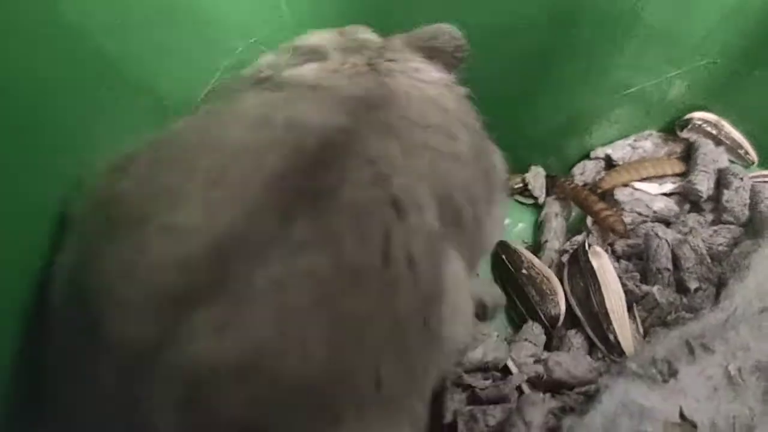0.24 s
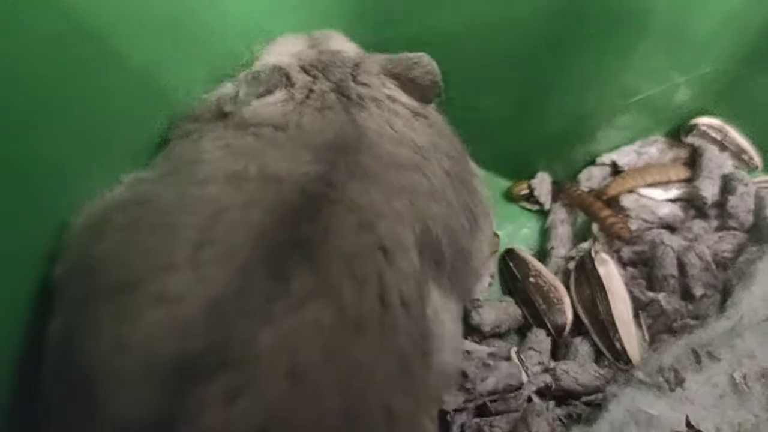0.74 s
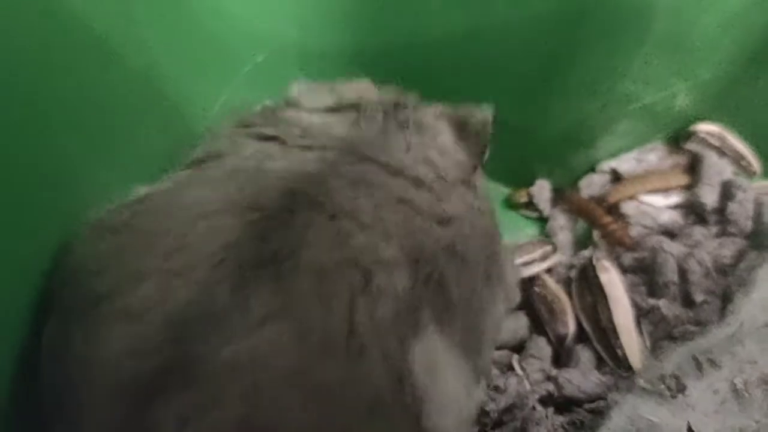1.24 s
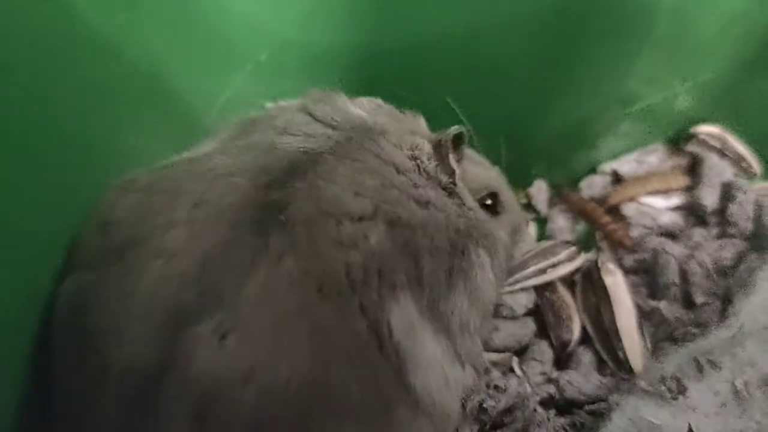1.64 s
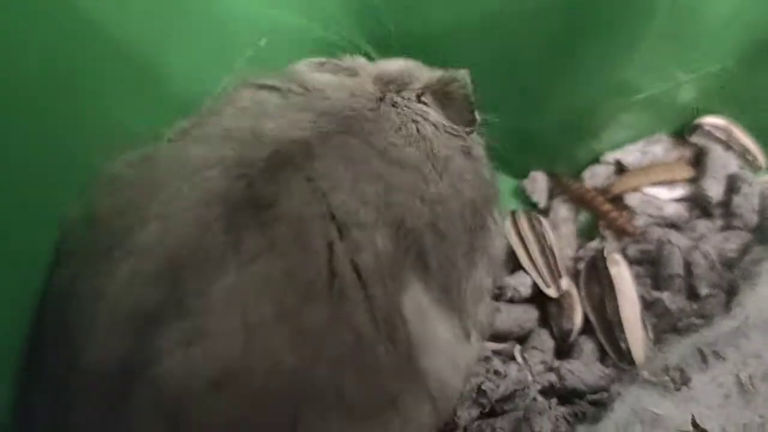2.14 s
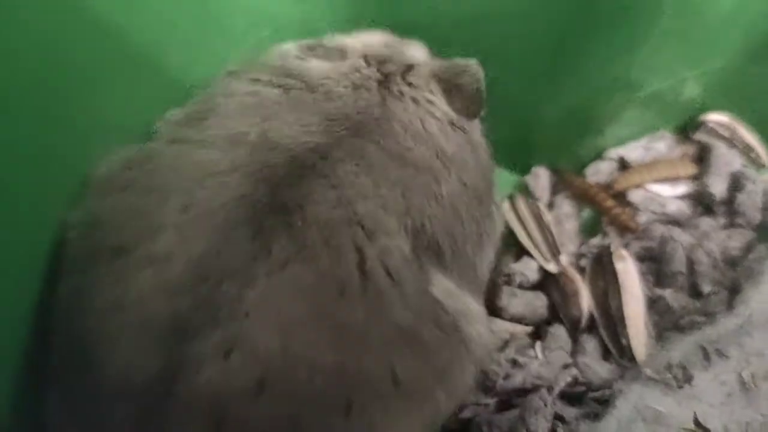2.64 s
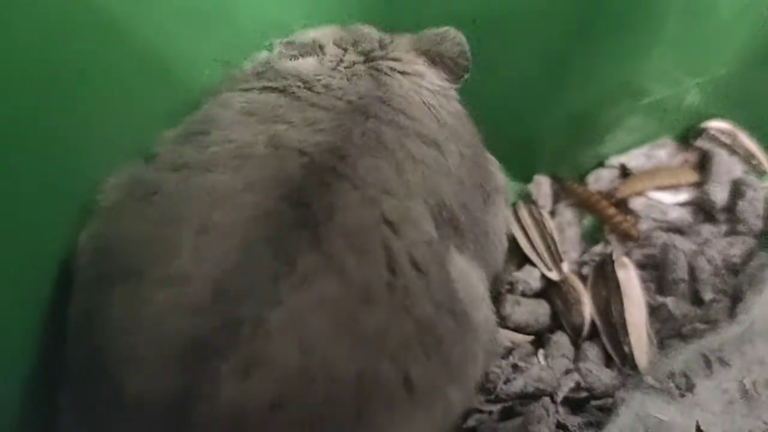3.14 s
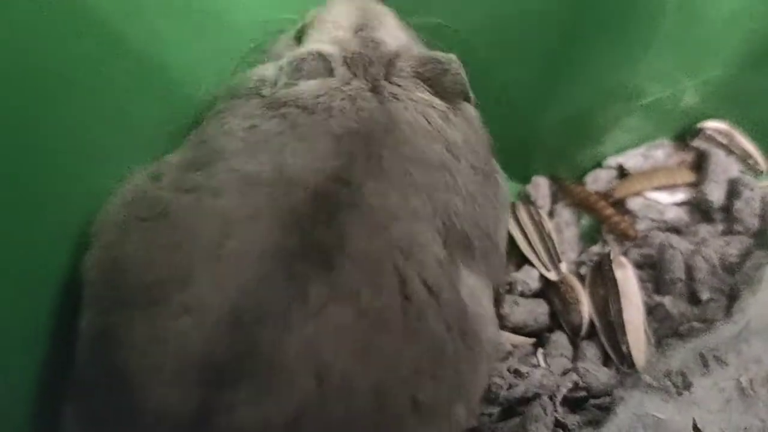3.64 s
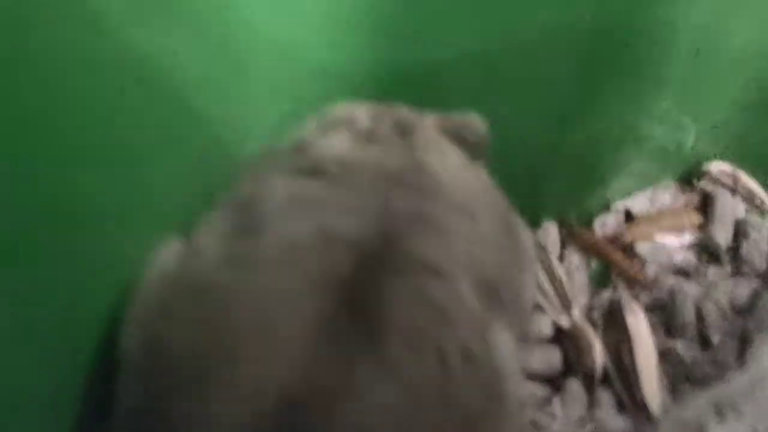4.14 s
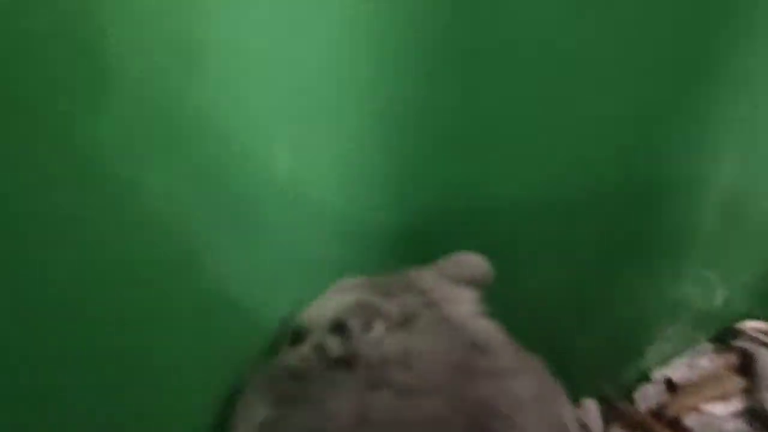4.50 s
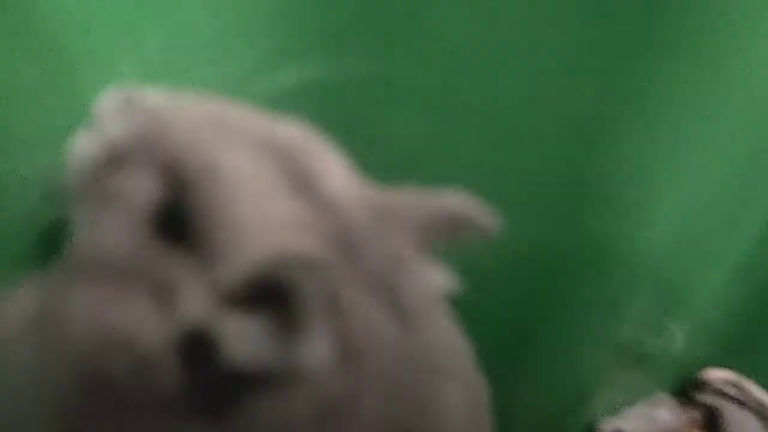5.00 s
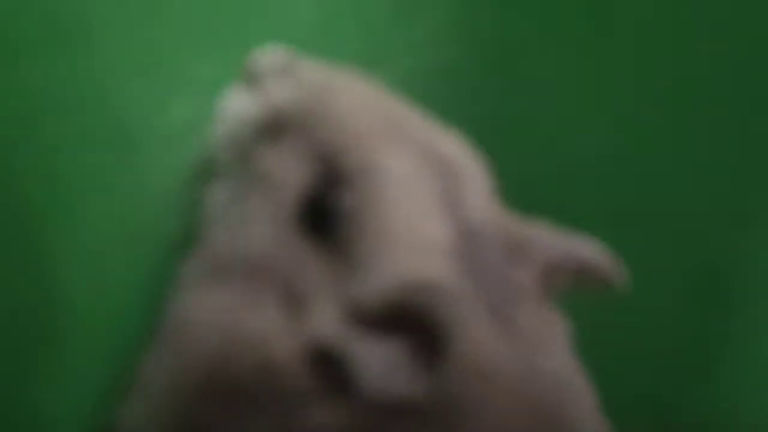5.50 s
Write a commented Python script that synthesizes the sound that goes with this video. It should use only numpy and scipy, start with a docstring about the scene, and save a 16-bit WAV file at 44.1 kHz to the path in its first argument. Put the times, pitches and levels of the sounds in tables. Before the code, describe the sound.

Quiet, close indoor sound: seed husks and claws tap a plastic wall with tiny short rings over faint papery rustling. The right side is crisp; the left is muffled with low finger sway. After sparser ticks around three seconds, a cluster of sharper clicks follows, then dull handling thuds, skin rubs and pressure pops dominate, fading to low unsteady rumble.

```python
"""In a plastic tub, close to a hand-held camera, a hamster shifts seeds and paper bedding.
Husks snap and tap the tub wall (short blows set off dying tones) over a rustle of many tiny taps.
Faint low noise is a swell in the room, then camera handling from about 4.4 s; a faint hum wavers.
A finger covers the left microphone port: it muffles the scene there and adds sway, rubbing and pops.
Near the end the hand slides on the camera as it is moved, with dull, ringing bumps."""
import sys
import numpy as np
from scipy import signal
from scipy.fft import rfft, irfft
from scipy.io import wavfile

SR = 44100
rng = np.random.default_rng(int(sys.argv[2]) if len(sys.argv) > 2 else 0)


def master(y):
    """Save y as 16-bit WAV."""
    cut = np.clip(np.atleast_2d(y).T, -1, 1)
    pcm = np.round(cut * 32767)  # scale
    wavfile.write(sys.argv[1], SR, pcm.astype(np.int16))


N = 254016
TIME = np.arange(N) / SR

# Faint low rumble: a swell in the room, then handling of the camera from about 4.4 s:
# start_s, level_db (rms)
RUMBLE_LEVEL = [(0.0, -60.5), (2.0, -59.5), (3.2, -44), (3.8, -48.5), (4.4, -43.5), (5.25, -56), (5.7, -48)]
# Tone colour of the rumble: pitch_hz, density_db (relative, per Hz)
RUMBLE_SPECTRUM = [(10, -2), (60, 2), (110, 2), (175, 0.5), (260, -7.5), (350, -15.5), (500, -29.5),
                   (1200, -96.5)]
# Steady background noise at the open right port: pitch_hz, density_db (per Hz)
OPEN_PORT_NOISE = [(20, -80), (170, -85.5), (240, -90), (300, -90.5), (450, -90.5), (550, -99),
                   (950, -95.5), (1400, -100), (1830, -96), (3200, -109), (4300, -123), (7400, -116),
                   (9500, -126), (16000, -129)]
# Steady background noise at the covered left port: pitch_hz, density_db (per Hz)
COVERED_PORT_NOISE = [(20, -77), (230, -108), (400, -107), (700, -109), (1200, -114), (1900, -110),
                      (3000, -118), (4500, -127), (16000, -129)]
# Shoves of the paws through the bedding: peak_s, length_s, scrape_db (on the tub), fizz_db (of paper)
SHOVES = [(0.334, .09, -48.5, -60.5), (0.466, 0.059, -54, -69), (0.59, 0.16, -55.5, -69),
          (0.724, 0.049, -57.5, -65), (0.939, 0.13, -52, -67), (1.023, 0.035, -71, -92),
          (1.214, 0.15, -58.5, -85), (1.324, 0.032, -59.5, -84), (1.472, .06, -56.5, -79),
          (1.781, 0.13, -55.5, -63), (1.915, 0.1, -60, -80), (2.11, 0.056, -61, -65.5),
          (2.246, 0.018, -55, -61), (2.475, .1, -63.5, -78), (2.522, 0.11, -50, -71),
          (2.752, 0.04, -52, -68), (3.488, 0.079, -58.5, -71), (3.81, 0.17, -55, -69),
          (3.946, 0.25, -60, -72.5), (4.606, 0.068, -44, -63), (4.75, 0.32, -60.5, -68.5),
          (5.122, 0.1, -62, -73), (5.715, 0.069, -55, -67.5)]
# Fur and paws pushing the bedding: pitch_hz, density_db (relative, per Hz)
SCUFF_SPECTRUM = [(100, -4.5), (300, -2.5), (460, -6), (560, 0.5), (720, -8), (1500, -14.5), (4000, -52)]
# Ringing tones of the tub: pitch_hz, level_db (relative), t60_s (time to fall by 60 dB)
TUB_MODES = [(455, -11.5, 0.051), (724, 0, 0.027), (856, -8, 0.062), (1034, 0.5, 0.033), (1094, 0, 0.034),
             (1373, -0.5, 0.04), (1714, -6.5, 0.011), (1810, 6, 0.039), (2084, 3.5, 0.009),
             (2280, -19.5, 0.0047), (2430, -7.5, 0.0094), (2575, 1, 0.012), (2670, -11, 0.042),
             (3370, -16.5, 0.0013), (3577, -9.5, 0.017)]
# Tone colour of a snapping husk: pitch_hz, level_db (relative)
HUSK_SPECTRUM = [(1500, -18), (3400, 4.5), (4300, -11.5), (5100, -1.5), (5900, -2.5), (6550, 2),
                 (6850, -1.5), (7250, 2.5), (7560, 3.5), (8200, -3), (9200, -11.5), (11000, -19.5),
                 (16000, -28.5)]
# How hard the finger presses on the left port: start_s, press_db (relative)
PRESS_LEVEL = [(0.0, -34.5), (0.55, -26.5), (0.75, -34.5), (1.9, -34.5), (2.05, -31), (2.25, -39.5),
               (2.98, -34.5), (3.15, -38), (4.12, -32.5), (4.48, -17.5), (4.56, -22.5), (4.64, -11),
               (4.73, -4.5), (4.9, -8), (5.12, -9.5), (5.19, -20), (5.53, -23.5), (5.62, -12),
               (5.76, -30.5)]
# Slow sway of the finger: pitch_hz, density_db (relative, per Hz)
SWAY_SPECTRUM = [(2, -16.5), (7, 6), (12, 7), (20, -2), (35, -8), (48, -25), (60, -25.5), (100, -46.5),
                 (200, -56), (500, -114.5)]
# Quick shiver of the fingertip: pitch_hz, density_db (relative, per Hz)
SHIVER_SPECTRUM = [(10, -24), (28, 7), (42, 4), (52, -7.5), (65, -16.5), (100, -23), (200, -49), (500, -93)]
# Slips of the finger over the port: peak_s, rise_s, fall_s, rub_db (counted above 330 Hz)
FINGER_SLIPS = [(3.94, 0.047, .04, -60.5), (4.24, 0.065, 0.21, -62.5), (4.5, 0.082, 0.058, -53),
                (4.63, 0.04, 0.029, -48.5), (4.96, 0.049, 0.054, -57), (5.099, 0.052, 0.04, -41.5),
                (5.41, 0.047, 0.13, -49), (5.66, 0.081, 0.077, -44.5)]
# Skin rubbing on the port: pitch_hz, density_db (relative, per Hz)
RUB_SPECTRUM = [(20, -13), (70, 5.5), (110, -8), (200, -12), (300, -17.5), (500, -26), (1000, -36),
                (2000, -45.5), (3000, -54), (4500, -76), (16000, -96)]
# What the finger lets through: pitch_hz, gain_db
FINGER_MUFFLE = [(50, -9.5), (250, -15.5), (700, -17.5), (1200, -34), (2000, -36.5), (4000, -43),
                 (8000, -49.5), (16000, -34.5)]
# Single seeds and claws on the tub, as rms over 10 ms: start_s, knock_db, wall_db, snap_db
SEED_TAPS = [(0.061, -50, -53, -82), (0.0769, -49.5, -44, -51.5), (0.2428, -42.5, -59, -71),
             (0.287, -50.5, -53, -63.5), (0.3103, -62, -38, -60), (0.3318, -65, -43, -58),
             (0.3562, -45, -51, -64), (0.382, -56, -54, -58), (0.4668, -66, -55, -59),
             (0.5883, -76, -45, -57.5), (0.7232, -51, -49, -77), (0.775, -56, -50.5, -71),
             (0.7974, -48.5, -44, -73), (0.8151, -56, -47.5, -70), (0.8689, -70, -52, -60),
             (0.9203, -49, -42, -69), (0.9702, -63, -56, -77), (1.0292, -49.5, -74, -90),
             (1.0752, -52, -77, -84), (1.2198, -53, -62, -68.5), (1.3073, -50.5, -55, -79),
             (1.5922, -50.5, -53.5, -67), (1.7371, -52, -53, -54), (1.804, -70, -73, -53.5),
             (1.8407, -54, -51.5, -68), (2.0032, -52.5, -53, -67), (2.064, -55, -50, -67.5),
             (2.1342, -58.5, -60, -58.5), (2.2116, -48.5, -51.5, -88), (2.5025, -43, -49, -70),
             (2.5128, -58, -46.5, -64), (2.6198, -48, -37, -46.5), (2.7707, -59, -58, -60),
             (2.7903, -47.5, -49.5, -68), (2.8713, -70, -66, -62.5), (2.997, -72, -67, -63),
             (3.1213, -66, -62, -59.5), (3.3174, -58.5, -59, -61.5), (3.4586, -46, -45, -50),
             (3.5811, -47, -42, -56), (3.6009, -44, -40.5, -47.5), (3.6479, -44, -43, -58.5),
             (3.7217, -43.5, -46, -70), (3.78, -56, -41.5, -59.5), (3.8111, -63, -48, -60),
             (3.9362, -47.5, -38, -50.5), (3.9407, -36.5, -37.5, -39.5), (3.98, -52, -39.5, -53),
             (4.0159, -61, -43, -67), (4.038, -76, -50, -83), (4.1043, -73, -51.5, -83),
             (4.1282, -72, -56, -85), (4.5822, -40.5, -38.5, -60), (4.5979, -36.5, -53, -45),
             (4.8065, -46.5, -51, -76), (4.8289, -41.5, -50, -67), (5.6992, -56, -58, -69)]
# Dull knocks as the fingertip shifts its grip: start_s, peak_db
GRIP_NUDGES = [(1.354, -37), (2.506, -35.5), (3.007, -47.5), (3.868, -36.5), (3.966, -36.5), (4.733, -22.5),
               (4.952, -28.5), (5.097, -19.5)]
# Ringing of air and skin at the covered port: pitch_hz, level_db (relative), t60_s
PORT_MODES = [(245, 3, 0.011), (425, -9.5, 0.025), (650, -14, 0.035)]
# The skin lets go of the port: start_s, peak_db, length_s
SKIN_POPS = [(4.47, -54, .0004), (4.492, -40.5, 0.00062), (4.522, -42, 0.0005), (4.5797, -41, 0.00072),
             (4.7408, -10.5, 0.0038), (4.7494, -27.5, 0.00055), (4.8591, -23, 0.0016),
             (5.0986, -34, 0.00065), (5.1065, -13, 0.00068), (5.115, -24.5, 0.0003)]
# The hand slides on the camera: start_s, level_db (rms)
SLIDE_LEVEL = [(4.57, -100), (4.61, -53), (4.69, -55), (4.78, -55), (4.84, -55), (4.9, -68), (5.0, -91),
               (5.1, -120)]
# Tone colour of the sliding hand: pitch_hz, density_db (relative, per Hz)
SLIDE_SPECTRUM = [(350, 5.5), (750, 8.5), (1200, 0), (1800, 9), (3000, -4), (4400, -18), (5600, -10),
                  (7300, -5.5), (9000, -9.5), (12000, -16), (16000, -22)]
# Bumps of the camera: start_s, wobble_db (lowest mode), thud_db (the other modes)
CAMERA_BUMPS = [(4.582, -21.5, -36), (4.599, -44, -29.5), (4.668, -26, -35), (4.8306, -27, -21)]
# Ringing tones of the bumped body: pitch_hz, level_db (relative), t60_s
BODY_MODES = [(28.7, 1.5, 0.91), (58.6, -14, .2), (94.4, -6, 0.44), (161.4, -3.5, 0.15), (197.4, 0, 0.054),
              (296, -0.5, 0.032), (545, -4.5, 0.029), (815, -5, 0.036)]

EDGE_HZ = 16100  # highest pitch that the camera passes
HUM_HZ, HUM_DB = 227.2, -63.5  # centre pitch, rms level
SHOVE_RISE = 0.5  # share of a shove's length that goes to the build-up
GRIP_RUB_DB = -51.5  # rubbing of the resting finger, relative to its press
# Small restless movements between shoves, steady until they fade out
FIDGET_SCRAPE_DB, FIDGET_FIZZ_DB = -67, -89
FIDGET_END_S, FIDGET_FADE_S = 2.92, 0.32  # start and length of the fade


def amp(db):
    """Turns decibels into a plain gain."""
    return 10 ** (np.asarray(db) / 20)


def rms(x):
    """Average strength: the root of the mean square."""
    return np.sqrt(np.mean(x ** 2) + 1e-24)


def level(table):
    """A gain curve drawn through points of time and decibels."""
    return amp(np.interp(TIME, *np.transpose(table)))


def add(mix, start_s, sound):
    """Mixes a sound in at its start time, cut off at the end of the mix."""
    part = mix[round(start_s * SR):][:len(sound)]
    part += sound[:len(part)]


def gains(points, size):
    """Reads a spectrum at the FFT pitches, with straight lines over log pitch."""
    hz, db = np.transpose(points)
    bins_hz = np.fft.rfftfreq(size, 1 / SR)
    return amp(np.interp(np.log(bins_hz + 1), np.log(hz + 1), db))


def noise(points):
    """Random hiss shaped to the given power per Hz."""
    white = rfft(rng.standard_normal(N))
    return irfft(white * gains(points, N), N) * np.sqrt(SR / 2)


def swell(gain, spectrum):
    """Coloured noise that follows a level curve."""
    x = noise(spectrum)
    return gain * x / rms(x)


def flutter(depth_db, rate_hz):
    """A random gain of unit rms that wanders mostly slower than the given rate."""
    x = noise([(rate_hz / 8, 0), (rate_hz, 0), (3 * rate_hz, -30), (12 * rate_hz, -80)])
    gain = amp(depth_db * x / rms(x))
    return gain / rms(gain)


def stroke(peak, rise, fall):
    """One smooth movement: it builds up to its peak and eases off."""
    return np.exp(-((TIME - peak) / np.where(TIME < peak, rise, fall)) ** 2)


def causal(points, size=1024):
    """The sharpest impulse response with the given spectrum (minimum phase)."""
    half = np.log(gains(points, size))
    whole = np.r_[half, half[-2:0:-1]]
    spectrum = np.exp(np.conj(signal.hilbert(whole)))
    return np.fft.ifft(spectrum).real[:size // 2]


def ring(modes, t, scatter_db, detune):
    """Dying tones; each blow lands elsewhere, so their weights and pitches vary."""
    hz, db, t60 = np.transpose(modes)[:, :, None]
    weight, shift, side = rng.standard_normal((3, len(modes), 1))
    envelope = amp(db + scatter_db * weight - 60 * t / t60)
    tone = np.sin(2 * np.pi * hz * (1 + detune * shift) * t)
    return (np.sign(side) * envelope * tone).sum(0)


def contact(t, scatter_db, t60, rise=0.00015):
    """A sharp blow, then a dying spray of tiny contacts and reflections."""
    decay = np.exp(-np.log(1000) * t / t60)
    spray = rng.standard_normal(len(t)) * decay * (1 - np.exp(-t / rise))
    return (t == 0) + amp(scatter_db) * spray / np.linalg.norm(spray)


def tap(husk, size=2400):
    """One seed on the tub: low knock, wall ring and husk snap, each of unit energy."""
    t = np.arange(size) / SR
    low_modes = [mode for mode in TUB_MODES if mode[0] < 1550]
    high_modes = [mode for mode in TUB_MODES if mode[0] >= 1550]
    blow = contact(t, scatter_db=-4.5, t60=0.037)
    knock = ring(low_modes, t, scatter_db=2.5, detune=0.01)
    wall = ring(high_modes, t, scatter_db=3.5, detune=0.012)
    crack = contact(t, scatter_db=2, t60=.019)
    pairs = ((blow, knock), (blow, wall), (crack, husk))
    parts = [signal.fftconvolve(a, b)[:size] for a, b in pairs]
    return np.array([part / np.linalg.norm(part) for part in parts])


def rumble():
    """Low noise on a level curve: a swell in the room, then camera handling from about 4.4 s."""
    return swell(level(RUMBLE_LEVEL), RUMBLE_SPECTRUM)


def hum(waver_hz):
    """A faint tone in the room whose pitch wavers at random."""
    drift = noise([(1, 0), (8, -2.0), (30, -53.0), (200, -100)])
    pitch_hz = HUM_HZ + waver_hz * drift / rms(drift)
    return amp(HUM_DB) * np.sqrt(2) * np.sin(2 * np.pi * np.cumsum(pitch_hz) / SR)


def stirring():
    """Strength of scraping and of fizz: the powers of shoves and fidgeting add up."""
    fidget = np.clip((FIDGET_END_S - TIME) / FIDGET_FADE_S + 1, 0, 1)
    power = np.outer(amp([FIDGET_SCRAPE_DB, FIDGET_FIZZ_DB]), fidget) ** 2
    for peak_s, length, *db in SHOVES:
        shove = stroke(peak_s, SHOVE_RISE * length, (1 - SHOVE_RISE) * length)
        power += np.outer(amp(db), shove) ** 2
    return np.sqrt(power)


def rustle(husk, scuff_db=-9, knock_db=1, per_s=1100, spread_db=7, count=20):
    """Crowds of tiny taps, as strong as the animal stirs, over the soft scuff of its body."""
    scrape, fizz = np.zeros((2, N))
    for _ in range(count):  # each kind of tap recurs at random times and strengths
        knock, wall, snap = tap(husk)
        hits = rng.random(N) < per_s / count / SR
        train = hits * amp(spread_db * np.minimum(rng.exponential(1, N), 3.2))
        scrape += signal.oaconvolve(train, amp(knock_db) * knock + wall)[:N]
        fizz += signal.oaconvolve(train, snap)[:N]
    scraping, fizzing = stirring()
    scuff = amp(scuff_db) * swell(scraping, SCUFF_SPECTRUM)
    return scraping * scrape / rms(scrape) + fizzing * fizz / rms(fizz) + scuff


def finger(sway_db=-1, shiver_db=-5, firm_db=-22):
    """The fingertip pumps the air trapped in the port, shivers in fits, and judders as it slides."""
    pressing = level(PRESS_LEVEL)
    rubbing = amp(GRIP_RUB_DB) * pressing
    for peak_s, rise, fall, db in FINGER_SLIPS:
        rubbing += amp(db) * stroke(peak_s, rise, fall)
    sway = noise(SWAY_SPECTRUM)
    # even out the sway, so that the press curve sets its strength
    sway /= np.sqrt(signal.oaconvolve(sway ** 2, np.hanning(SR // 7) / (SR // 14), "same"))
    shiver = noise(SHIVER_SPECTRUM) * flutter(depth_db=4, rate_hz=15)
    # a firm press damps the shiver
    shiver *= amp(shiver_db) / rms(shiver) / np.sqrt(1 + pressing / amp(firm_db))
    pressure = pressing * (amp(sway_db) * sway + shiver)
    # the seal leaks when pushed hard, which rounds off the largest swings
    pressure /= (1 + (pressure / .72) ** 4) ** .25
    rub = noise(RUB_SPECTRUM) * flutter(depth_db=3.0, rate_hz=100)
    high_pass = signal.butter(4, 330, "hp", fs=SR, output="sos")
    rub /= rms(signal.sosfilt(high_pass, rub))
    return pressure + rubbing * rub


def stray_ticks(husk, over_db=7, spread_db=3, limit_db=-56, count=64):
    """Loose grains flicked aside, dull or crisp; harder stirring is louder, up to a limit."""
    out = np.zeros(N)
    scraping, fizzing = stirring()
    for when, size, crisp in rng.random((count, 3)):
        at = int(when * N)
        # strengths of knock, wall ring and snap
        strength = np.array([2 * (1 - crisp) * scraping[at], scraping[at], 2 * crisp * fizzing[at]])
        gain = amp(over_db + spread_db * (2 * size - 1.5)) / (1 + scraping[at] / amp(limit_db))
        add(out, at / SR, gain * strength @ tap(husk) * np.sqrt(SR / 100))
    return out


def clicks(husk):
    """The distinct taps and snaps of single seeds and claws."""
    out = np.zeros(N)
    for start_s, *db in SEED_TAPS:
        # the root turns unit energy into unit rms over 10 ms
        add(out, start_s, amp(db) @ tap(husk) * np.sqrt(SR / 100))
    return out


def nudges():
    """Each shift of the fingertip rings dully in the air and skin at the port."""
    out, t = np.zeros(N), np.arange(SR // 25) / SR
    for start_s, db in GRIP_NUDGES:
        thump = ring(PORT_MODES, t, scatter_db=1, detune=.05)
        add(out, start_s, amp(db) * thump / abs(thump).max())
    return out


def pops():
    """Jumps of pressure that leak away and undershoot as the skin lets go."""
    out, t = np.zeros(N), np.arange(SR // 25) / SR
    for start_s, db, length in SKIN_POPS:
        add(out, start_s, amp(db) * (1 - t / length) * np.exp(-t / length))
    return out


def slide():
    """The hand slides on the camera: coloured noise with a rough flutter."""
    return swell(level(SLIDE_LEVEL), SLIDE_SPECTRUM) * flutter(depth_db=3.3, rate_hz=120)


def bumps():
    """Dull thuds, each with a slow wobble in the lowest mode of the body."""
    out, t = np.zeros(N), np.arange(SR // 2) / SR
    for start_s, wobble_db, thud_db in CAMERA_BUMPS:
        wobble = ring(BODY_MODES[:1], t, scatter_db=.3, detune=.03)
        thud = ring(BODY_MODES[1:], t, scatter_db=1, detune=.08)
        add(out, start_s, amp(wobble_db) * wobble + amp(thud_db) * thud)
    return out


def scene():
    """The right port hears the tub; the left one hears mostly the finger."""
    husk = causal(HUSK_SPECTRUM)
    background = rumble() + hum(waver_hz=1.2)
    hamster = rustle(husk) + stray_ticks(husk) + clicks(husk)
    hand = slide() + bumps()
    air = background + hamster + hand
    muffled = signal.oaconvolve(air, causal(FINGER_MUFFLE))[:N]
    left = muffled + finger() + nudges() + pops() + noise(COVERED_PORT_NOISE)
    right = air + noise(OPEN_PORT_NOISE)
    return np.array([left, right])


def record(dry):
    """The band limit of the camera: a steep low-pass filter."""
    low_pass = signal.firwin(255, EDGE_HZ, window=("kaiser", 9), fs=SR)
    return signal.oaconvolve(dry, low_pass[None], "same")


dry = scene()
out = record(dry)
master(out)
```